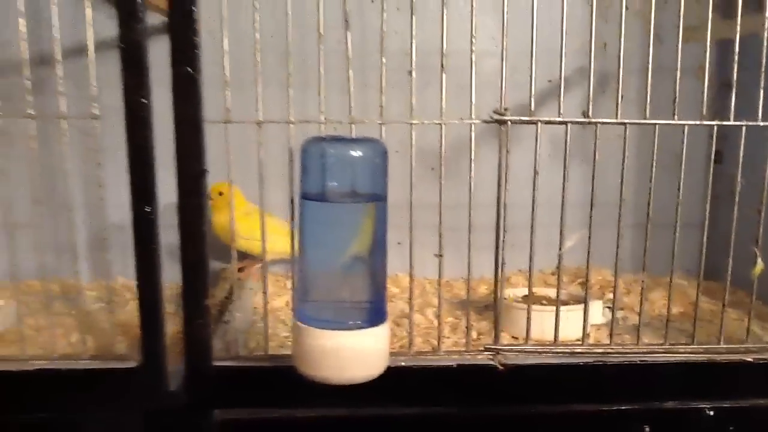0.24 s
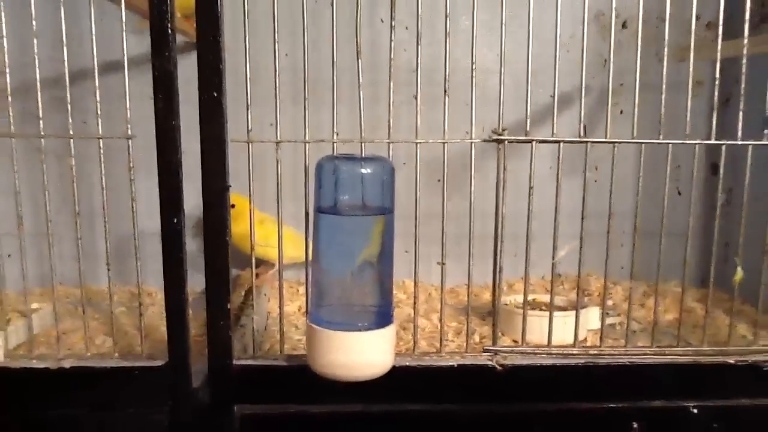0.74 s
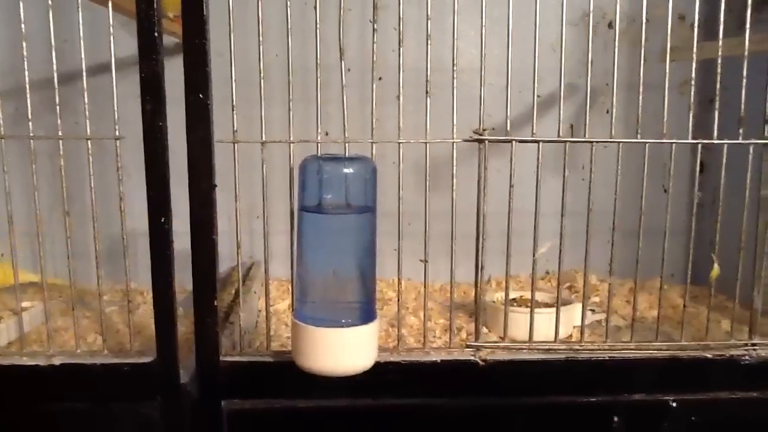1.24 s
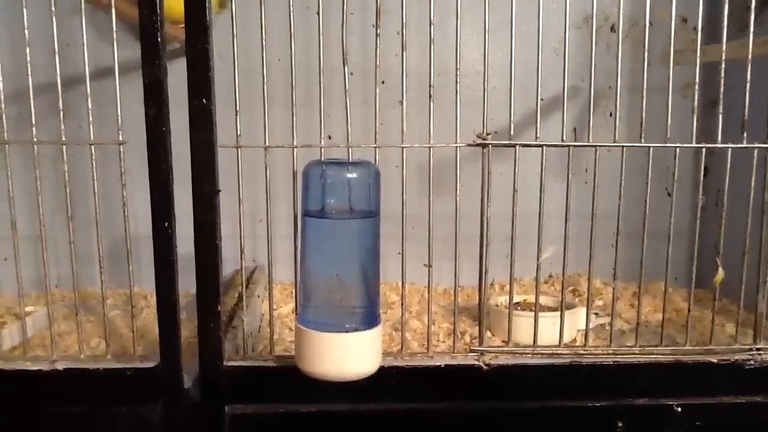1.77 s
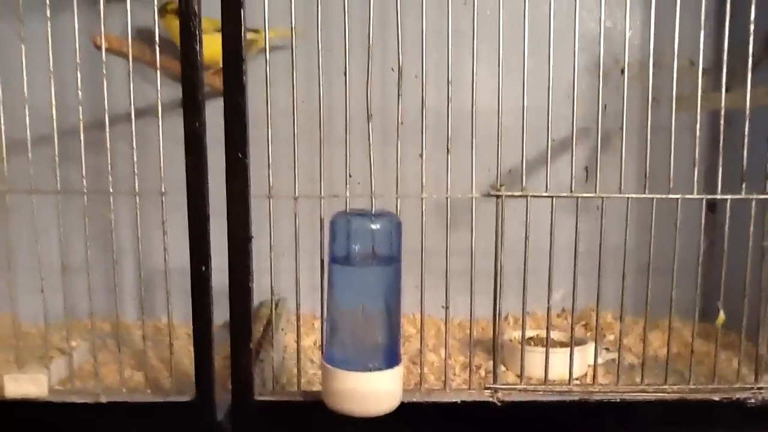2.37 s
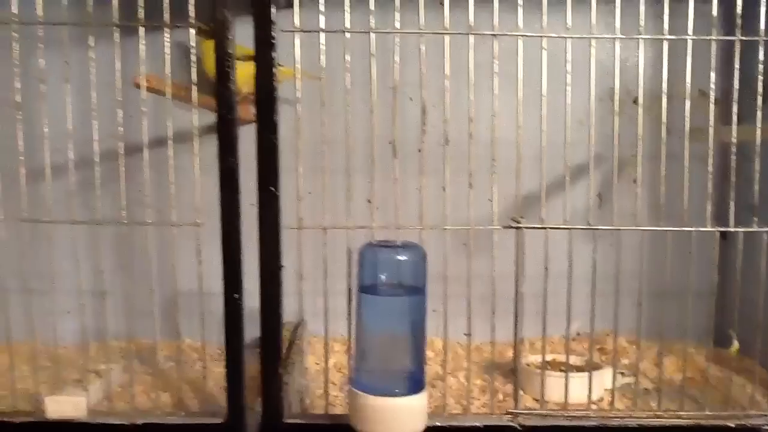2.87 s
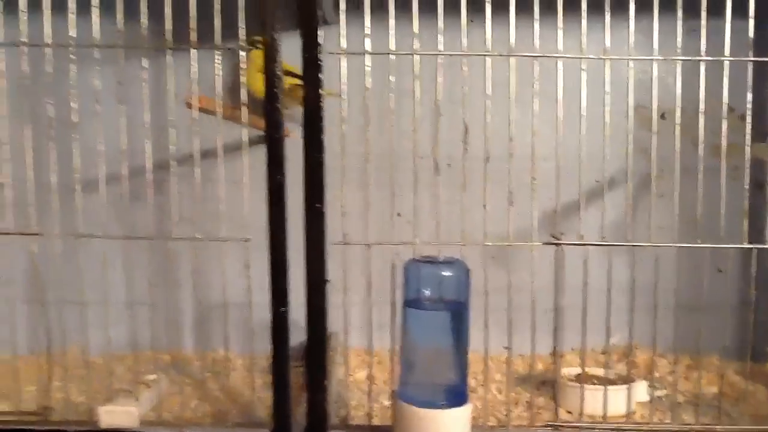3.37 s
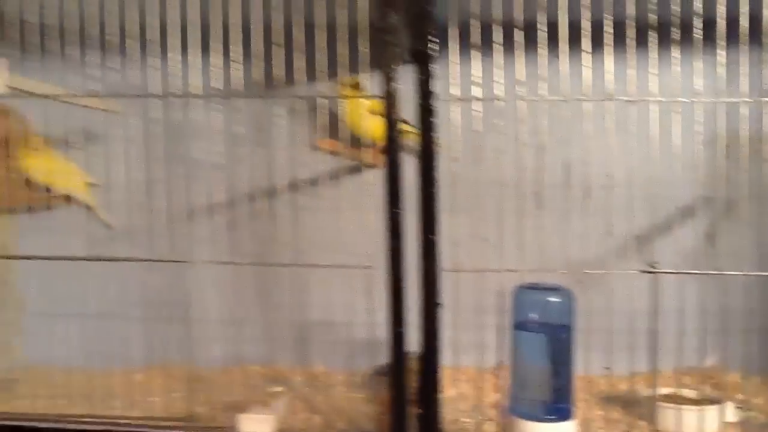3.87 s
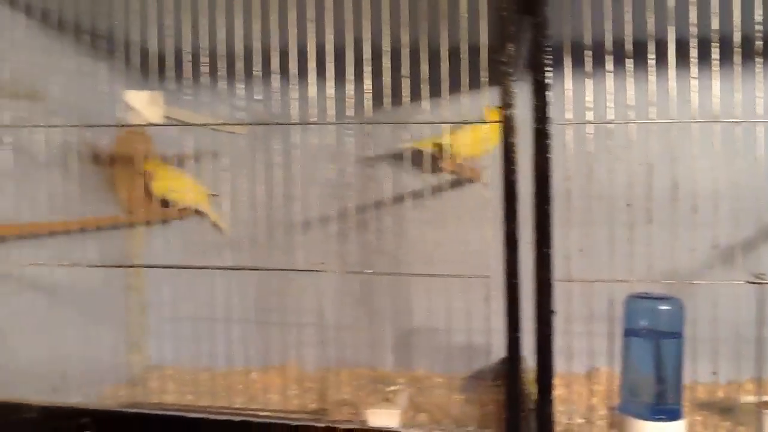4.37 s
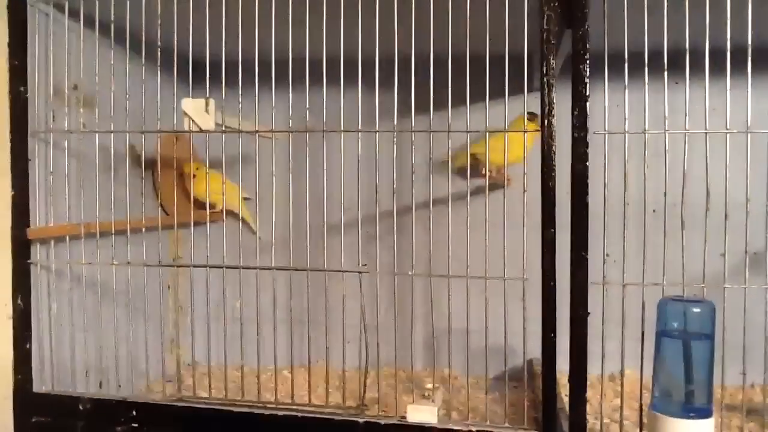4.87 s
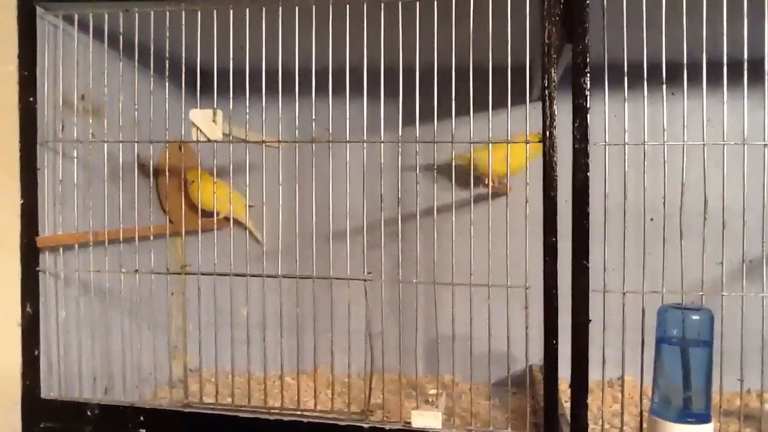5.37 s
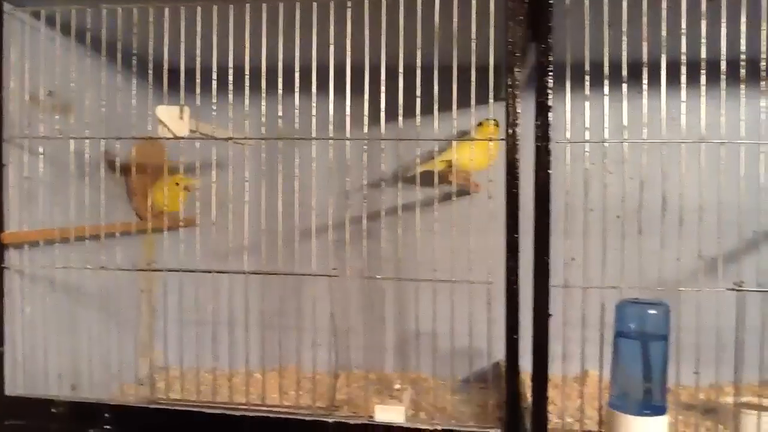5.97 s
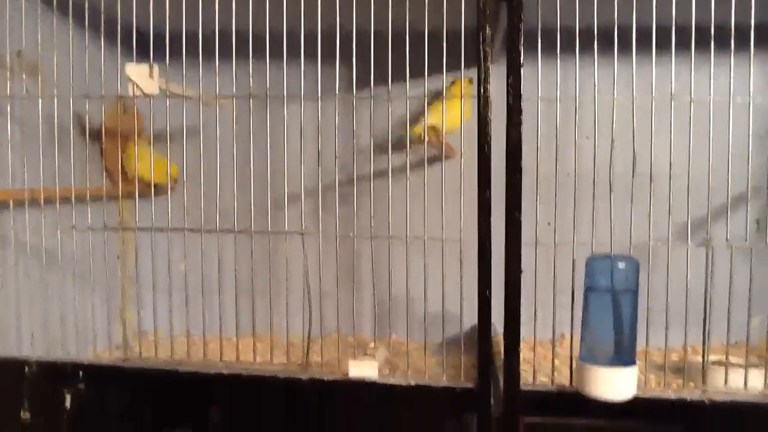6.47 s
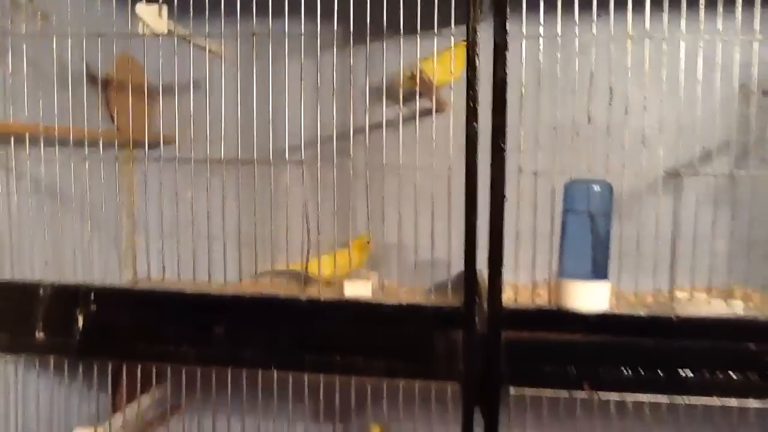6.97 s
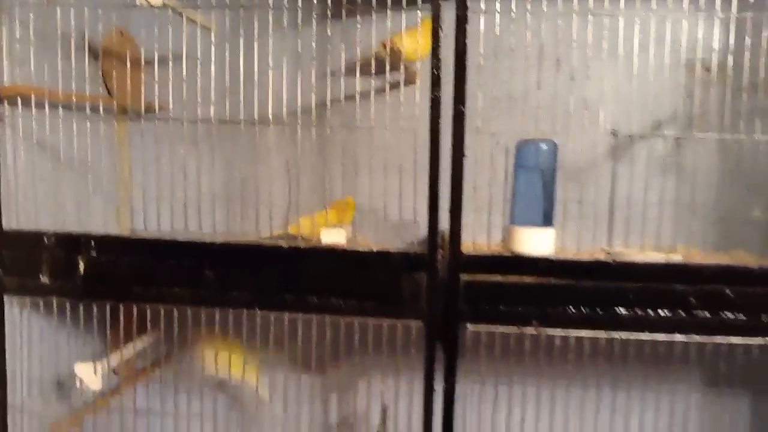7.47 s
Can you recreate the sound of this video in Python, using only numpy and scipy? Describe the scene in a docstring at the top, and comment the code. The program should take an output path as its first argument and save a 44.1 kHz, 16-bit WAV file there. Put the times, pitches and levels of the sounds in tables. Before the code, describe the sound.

Caged finches move about indoors, heard close up: quick squeaky chirps with seed scratching first, then dry little rattles of perch, tray and bars. Around the middle comes one loud, clattering knock with a dull boom, followed by quieter hops and a single piercing snap of a husk. Thin faint whistles, feathery rustling and low hiss lie underneath, with a short room echo.

```python
"""Small finches land and hop on stacked wire breeding cages in a small room, close to the microphone.
Landings are dying rattles that ring tray, perch and bars and scatter litter; one hard jump bangs a cage.
Beaks scuff through resonant seed grains, husks crack in short snaps, and hoarse gliding chirps slip out.
Behind them: dull low thuds, thin high whistles, a steady rustle and hum of the cages, and the room's hiss."""
import sys
import numpy as np
from scipy import signal
from scipy.fft import rfft, irfft
from scipy.io import wavfile
from scipy.ndimage import uniform_filter1d

SR = 44100
rng = np.random.default_rng(int(sys.argv[2]) if len(sys.argv) > 2 else 0)


def put_to_file(sound):
    """Save the sound as 16-bit audio at rate SR, in the file named by the first command-line argument."""
    columns = np.atleast_2d(sound).T  # one column per channel
    safe = np.clip(columns, -1, 1)
    whole_steps = np.round(safe * 32767)
    wavfile.write(sys.argv[1], SR, whole_steps.astype(np.int16))


N = 341334
SPAN = 16384   # samples given to one landing, scuff, thud or ring (0.37 s)


def amp(db):
    """Decibels to gain."""
    return 10 ** (np.asarray(db) / 20)


def unit(x):
    """Scales to rms 1."""
    return x / np.sqrt(np.mean(x ** 2) + 1e-24)


def crest_one(x):
    """Scales so that the loudest 8 ms have rms 1."""
    return x / np.sqrt(uniform_filter1d(x ** 2, size=350).max() + 1e-24)


def at_hz(points, hz):
    """Reads a table of values against frequency on a log-frequency axis."""
    p = np.array(points)
    return np.interp(np.log(np.maximum(hz, 1)), np.log(p[:, 0]), p[:, 1])


def coloured(x, spectrum):
    """Gives a sound the spectrum of a table."""
    n = x.shape[-1]
    bins_hz = np.arange(n // 2 + 1) * SR / n
    return irfft(rfft(x) * amp(at_hz(spectrum, bins_hz)), n)


def grains(count, per_s, spread_db):
    """Random tiny contacts, a few much stronger than the rest."""
    chance, strength, side = rng.random((3, count))
    size = amp(spread_db * np.minimum(-np.log(strength + 1e-9), 4))
    return (chance < per_s / SR) * size * np.sign(side - .5)


def add(out, s, x):
    """Mixes x into out from time s."""
    i = max(round(s * SR), 0)
    out[i:i + len(x)] += x[:N - i]


def ringing(modes, size):
    """Spectra of the modes' answers to a click: a quickly damped thump, then the long ring."""
    t = np.arange(SPAN) / SR
    hz, db, t60 = np.transpose(modes)[:, :, None]
    thump = 1 + 7.2 * amp(-60 * t / (0.023 + 3.6 / hz))
    ring = amp(db - 60 * t / np.maximum(t60, .02)) * np.sin(2 * np.pi * hz * t)
    return rfft(thump * ring, size)


# Hiss of the room, spectrum shape: pitch_hz [Hz], relative_density_db [dB per Hz]
HISS = [(12, -53), (20, -22.5), (59, -27), (196, 12.5), (465, -5), (534, 5), (614, -3), (1300, -19.5),
        (2840, -9.5), (11400, -13), (14300, -24), (15500, -8.5)]
HISS_DB = -70   # rms


def hiss():
    """Steady random noise with the colour of the room's hiss."""
    return amp(HISS_DB) * unit(coloured(rng.standard_normal(N), HISS))


# Modes of tray, perch and bars, also rung by the landings:
# pitch_hz [Hz], relative_level_db [dB], long_ring_t60_s [s]
CAGE_MODES = [(163.5, -3, 0.33), (193, -1, 0.35), (231.6, 5.5, 0.25), (288.3, -0.5, 0.6), (337.5, 0, 0.24),
              (409, 0, 0.072), (489.4, 3.5, 0.18), (536.3, 3, 0.58), (616, 3, 0.16), (706.7, 4, 0.39),
              (790.5, 5, 0.064), (918, 4, 0.088), (973, 2.5, 0.13), (1057, 2, 0.047), (1202, 2, 0.1),
              (1320, 4, 0.064), (1462, 2.5, 0.078), (1600, 5, 0.031), (1808, 2.5, 0.077), (1902, -0.5, 0.2),
              (2100, 0.5, 0.076), (2230, -2.5, 0.073), (2404, -1.5, 0.037)]


def cage_rings():
    """Response of each cage mode, padded for long rings."""
    return ringing(CAGE_MODES, 2 * SPAN)


def cage_parts():
    """Which modes belong to tray, perch and bars, from low to high."""
    hz = np.array(CAGE_MODES)[:, 0]
    return [hz < 450, (hz >= 450) & (hz < 1000), hz >= 1000]


# Restless birds all round, levels joined by straight lines:
# start_s [s], humming_db [dB, cages, before the shares below], rustle_db [dB rms, feathers and litter]
BUSTLE = [(0.0, -61, -57), (0.19, -56.5, -51), (0.39, -64.5, -68), (0.62, -68, -62.5), (0.77, -63.5, -61),
          (1.4, -65, -60.5), (1.7, -70.5, -60), (2.13, -69.5, -62.5), (2.28, -58, -62.5),
          (2.52, -62.5, -58), (2.8, -70.5, -65.5), (3.1, -69.5, -65.5), (3.25, -62.5, -64),
          (3.71, -65.5, -62), (3.97, -65, -64), (4.12, -39.5, -60), (4.24, -59, -59), (4.4, -65.5, -64),
          (4.83, -68.5, -62), (5.13, -70, -67), (5.41, -72.5, -66), (5.56, -61.5, -69), (5.76, -66, -60.5),
          (6.06, -62.5, -64), (6.4, -69.5, -66), (6.64, -71.5, -66), (6.81, -64, -64), (7.24, -65.5, -62.5),
          (7.52, -64, -58), (7.74, -65.5, -60)]
# Feathery rustle, spectrum shape: pitch_hz [Hz], relative_density_db [dB per Hz]
FEATHERS = [(710, -47), (1200, -5), (1380, -6.5), (1550, -6), (1710, -11.5), (3430, -7.5), (13600, -8),
            (15500, -13)]
# Share of trays, perches and bars in the humming [dB each]
HUM_SHARES = -6.5, -4.5, -6.5


def bustle():
    """Faint unceasing contacts in all the cages: the same modes kept ringing, and feathery rustle."""
    s, *levels = np.transpose(BUSTLE)
    humming, feathers = (amp(np.interp(np.arange(N) / SR, s, db)) for db in levels)
    out = feathers * unit(coloured(grains(N, 9000.0, 0.88), FEATHERS))
    # the hum dies sooner than a landing's ring: an extra t60 of 0.072 s
    damping = amp(-60 * np.arange(SPAN) / SR / 0.072)
    signs = (-1) ** np.arange(len(CAGE_MODES))
    for share_db, part in zip(HUM_SHARES, cage_parts()):
        body = irfft(part * signs @ cage_rings())[:SPAN] * damping
        hum = signal.fftconvolve(grains(N, 600.0, 0.77), body)[:N]
        out = out + humming * amp(share_db) * unit(hum)
    return out


# Thin high whistle, in arches: start_s [s], length_s [s], start_hz [Hz], top_hz [Hz, about],
# end_hz [Hz], level_db [dB rms, before flicker and fades]
WHISTLES = [(3.3, .41, 11050, 11800, 11050, -74), (3.74, .09, 11100, 11250, 11050, -74),
            (5.65, .35, 11200, 12000, 11150, -74), (6.0, .145, 11100, 11250, 11000, -72)]


def whistles():
    """A thin, flickering, very high tone whose pitch rises and sinks again."""
    out = np.zeros(N)
    for s, length, start_hz, top_hz, end_hz, db in WHISTLES:
        u = np.linspace(0, 1, round(length * SR))
        base_hz = start_hz + (end_hz - start_hz) * u
        arch_hz = top_hz - (start_hz + end_hz) / 2
        hz = base_hz + arch_hz * np.sin(np.pi * u ** 1.3)
        flicker = amp(3 * unit(uniform_filter1d(rng.standard_normal(len(u)), size=900)))
        tone = np.sqrt(2) * np.sin(2 * np.pi * np.cumsum(hz) / SR)
        add(out, s, amp(db) * flicker * tone * signal.windows.tukey(len(u), .15))
    return out


# Room echo by pitch: pitch_hz [Hz], t60_s [s]
WALLS = [(100, 0.83), (700, 0.37), (4000, 0.15), (13000, 0.12)]


def room(x):
    """Diffuse echo: noise dying at its own rate in each octave, after a half-millisecond rise."""
    t, tail = np.arange(SPAN) / SR, 0
    for hz in 90 * 2. ** np.arange(8):
        band = signal.butter(2, [hz / np.sqrt(2), hz * np.sqrt(2)], "band", fs=SR, output="sos")
        decay = amp(-60 * t / max(at_hz(WALLS, hz), .03))
        octave = signal.sosfilt(band, rng.standard_normal(SPAN)) * decay
        # energy in proportion to the width of the octave
        tail = tail + octave * np.sqrt(hz / np.sum(octave ** 2) / SR * 4)
    return signal.fftconvolve(x, tail * np.minimum(t / 0.0005, 1))[:N]


# Dull thuds through the cage stack: start_s [s], level_db [dB, about 1 dB under the swing's crest], pitch_hz [Hz]
THUDS = [(1.759, -57, 96), (2.037, -65, 96.9), (2.305, -69, 121.4), (4.052, -42, 70.6), (5.652, -73.5, 107),
         (6.142, -61, 122), (6.83, -60, 118)]


def thuds():
    """A soft push that swings a few low cycles."""
    out, t = np.zeros(N), np.arange(SPAN) / SR
    for s, db, hz in THUDS:
        push = (t / 0.0095) * np.exp(1 - t / 0.011)
        add(out, s, amp(db) * np.sin(2 * np.pi * hz * t) * push)
    return out


# Short hoarse chirps and low squeaks: start_s [s], length_s [s], start_hz, middle_hz, end_hz [Hz],
# level_db [dB, fundamental], second_db, third_db [dB, partials against the fundamental],
# hoarseness [0-1, typical pitch tremble as a fraction of the pitch]
CHIRPS = [(0.307, 0.047, 3506, 3054, 3434, -42, -15, -10, 0.093),
          (0.322, 0.039, 2406, 2386, 2624, -52.5, -2.5, 3, 0.088),
          (0.58, 0.06, 2910, 3190, 3140, -51, -9.5, -13, 0.07),
          (0.584, 0.052, 2230, 2344, 2470, -51.5, -6, -8, 0.12),
          (0.738, 0.051, 3290, 5470, 4710, -39, -4.5, -23, 0.072),
          (0.747, 0.045, 3770, 4440, 3840, -43.5, -9, -25, 0.064),
          (0.751, 0.0276, 2280, 2424, 2290, -48.5, -14, -22, 0.097),
          (0.869, 0.066, 1983, 3535, 2990, -44, -7, 0.5, 0.112),
          (.875, 0.061, 2090, 2670, 2230, -46, 0.5, -13, 0.11),
          (1.061, 0.07, 1910, 2150, 2292, -49.5, -9, 1, 0.23),
          (1.4, 0.03, 2550, 2656, 2520, -53, -6, -5, 0.08),
          (1.403, 0.032, 3160, 3260, 3250, -54.5, -7, -9, 0.045),
          (2.615, 0.032, 2950, 3005, 2540, -48, -5.5, -11, 0.058),
          (3.08, 0.035, 3250, 3320, 3230, -53, -3, -7, 0.054),
          (3.082, 0.026, 4740, 4680, 4140, -53, -5, -20, 0.013),
          (4.818, 0.02, 5960, 6220, 5950, -52, -30, -30, .01),
          (5.586, 0.044, 4860, 4760, 4720, -59, -30, -30, 0.028),
          (2.106, 0.14, 525, 546.6, 533, -52.5, -9, -7, 0.067),
          (2.74, 0.092, 548, 535, 550, -60.5, -14, -12, 0.046),
          (5.402, 0.1, 460, 514, 528, -63, -24, -22, 0.046),
          (7.064, 0.071, 557, 563, 507, -59.5, -24, -2, .01),
          (7.421, 0.049, 527, 549, 485, -60.5, -25, -19, 0.044)]


def chirps():
    """A gliding tone with two overtones; its pitch trembles fast, the more the hoarser."""
    out = np.zeros(N)
    for s, length, *glide_hz, db, second_db, third_db, hoarse in CHIRPS:
        u = np.linspace(0, 1, round(length * SR))
        tremble = unit(signal.lfilter([1], [1, -.93], rng.standard_normal(SPAN)))
        tremble = tremble[200:200 + len(u)]   # past the filter's start
        hz = np.interp(u, [0, .4, 1], glide_hz) * (1 + hoarse * tremble)
        phase = 2 * np.pi * np.cumsum(hz) / SR
        overtones = amp(second_db) * np.sin(2 * phase) + amp(third_db) * np.sin(3 * phase)
        swell = np.sin(np.pi * u ** 1.07) ** 0.82
        add(out, s, amp(db) * (np.sin(phase) + overtones) * swell)
    return out


# Husks cracking: start_s [s, first give], level_db [dB, peak of the snap], pitch_hz [Hz, ring],
# scatter_db [dB, bits against the snap]
CRACKS = [(0.1144, -41, 11000, -18), (0.4514, -52, 10400, -13), (0.5075, -51.5, 11500, -5),
          (0.8812, -29, 11400, -19), (1.9092, -23, 9700, -38), (2.4704, -44, 9200, -13),
          (2.9244, -55, 11500, -10), (2.976, -47, 9500, -25), (3.0235, -46, 9230, -20),
          (3.0719, -49, 9400, -20), (4.9521, -4.5, 9540, -19), (5.1746, -44, 9100, -31.5),
          (5.2213, -34, 11200, -15), (6.1473, -44, 7800, -0.5)]
# Dry chaff, spectrum shape, also for scuffs and landings: pitch_hz [Hz], relative_density_db [dB per Hz]
CHAFF = [(4000, -46), (6000, -6.5), (8500, 4), (10500, 4.5), (13000, -0.5), (15500, 0.5)]
GIVE_DB, SNAP_S = -26, .00008   # the husk's first give against the snap; time scale of the snap


def cracks():
    """A faint first give, one hard snap ringing under a millisecond, then scattering bits."""
    out, t = np.zeros(N), np.arange(SPAN // 4) / SR
    for s, db, hz, scatter_db in CRACKS:
        snap = np.sin(2 * np.pi * hz * t) * (t / SNAP_S / 2) ** 2 * np.exp(2 - t / SNAP_S)
        scatter = grains(len(t), 12000.0, 3.8) * amp(-60 * t / 0.018)
        bits = coloured(scatter, CHAFF)[:-400]   # without the end, where colouring wraps round
        add(out, s, amp(db + GIVE_DB) * snap)
        add(out, s + 0.00091, amp(db) * snap)
        add(out, s + 0.0011, amp(db + scatter_db) * crest_one(bits))
    return out


# Beak or claws through seed: start_s [s, halfway up the swell], level_db [dB, heap's loudest 8 ms],
# pitch_hz [Hz, throat of the heap], width_hz [Hz, of one filter pass],
# chaff_db [dB against the heap], swell_s [s], fade_t60_s [s]
SCUFFS = [(.324, -52, 3290, 900, 6, 0.04, 0.18), (.602, -47.5, 3000, 1210, -9, 0.026, 0.14),
          (0.747, -44.5, 4400, 1110, 0, 0.042, 0.21), (0.882, -47, 3670, 3080, 4.5, 0.049, 0.19),
          (1.075, -48.5, 2730, 2850, 9, 0.041, 0.24), (1.2243, -58.5, 1960, 2000, 13, 0.022, 0.074),
          (1.205, -60.5, 3950, 3000, 9, 0.0094, 0.081), (1.41, -62.5, 2870, 1200, 11.5, 0.036, 0.083),
          (2.625, -61.5, 4170, 2500, 3, 0.013, 0.13), (3.097, -60, 3900, 2500, 0, 0.026, 0.99)]


def scuffs():
    """Dense seed grains swell and fade through one broad resonance, with dry chaff on top."""
    out, t = np.zeros(N), np.arange(SPAN) / SR
    for s, db, hz, width_hz, chaff, swell, t60 in SCUFFS:
        rise = np.sin(np.pi / 2 * np.minimum(t / swell, 1)) ** 2
        stroke = rise * amp(-60 * np.maximum(t - swell, 0) / t60)
        seeds = stroke * grains(SPAN, 9700.0, 4.7)
        r = np.exp(-np.pi * width_hz / SR)
        throat = [1, 0.0088, -0.75], [1, -2 * r * np.cos(2 * np.pi * hz / SR), r * r]
        heap = signal.lfilter(*throat, signal.lfilter(*throat, seeds))
        dry_chaff = amp(chaff) * crest_one(coloured(seeds, CHAFF))
        add(out, s - 0.5 * swell, amp(db) * (crest_one(heap) + dry_chaff))
    return out


# Landings and knocks: start_s [s, rattle half built up], level_db [dB, reference for the next five],
# tray_db, perch_db, bars_db, litter_db, chaff_db [dB, loudest 8 ms against level_db],
# tray_hz, perch_hz, bars_hz, wires_hz [Hz, favoured pitch of each part],
# favour_db [dB, how much the cage favours the first three], shaking_t60_s [s]
HOPS = [(0.026, -42.5, -20, -26, -24, -19, -9.5, 164, 590, 1270, 7300, 8.9, 0.26),
        (0.072, -41.5, -21, -14, -22, -19, -13, 175, 570, 1180, 9540, 10, 0.18),
        (0.106, -38, -15.5, -14, -14.5, -24, -26, 164, 810, 1350, 2880, 9.5, 0.29),
        (0.197, -28.5, -29.5, -24, -13, -16.5, -27, 410, 1010, 1280, 2500, 5, 0.12),
        (0.668, -32.5, -29, -24, -13.5, -13.5, -18, 155, 940, 1610, 4000, 6.6, 0.16),
        (0.971, -43.5, -49, -45, -28, -20, -4, 366, 479, 2310, 9900, 10, 0.17),
        (1.353, -39, -20, -23, -9, -13.5, -13.5, 169, 605, 1690, 2500, 10, 0.12),
        (1.389, -42.5, -18.5, -30, -18, -12, -10.5, 420, 564, 2110, 2500, 11, 0.15),
        (1.554, -46.5, -21, -34, -42, -30, -6.5, 322, 664, 1400, 9960, 8.9, 0.43),
        (1.675, -46.5, -24, -20, -10.5, -21, -16, 229, 640, 1390, 2590, 6.1, 0.21),
        (1.753, -44, -17, -26, -14, -19, -14, 217, 590, 1510, 3300, 4.3, 0.45),
        (1.906, -31, -44, -47, -36, -28.5, -13.5, 205, 721, 2320, 9400, 7.6, 0.2),
        (2.035, -55, -6, -13, -23, -35, -33, 260, 630, 1340, 4620, 10, 0.11),
        (2.11, -39.5, -25, -9, -13, -25, -15, 454, 520, 1630, 7060, 10.4, 0.44),
        (2.183, -35, -23, -20.5, -15.5, -23, -11.5, 237, 527, 1600, 10400, 10, 0.27),
        (2.296, -37, -13.5, -18, -13, -12.5, -20, 189.6, 655, 1320, 3900, 10, 0.062),
        (2.317, -40, -11, -12.5, -15, -22, -10.5, 195, 665, 2320, 2710, 10, 0.12),
        (2.347, -39, -17, -11.5, -16.5, -12, -27, 191, 556, 1390, 4130, 12, 0.12),
        (2.473, -53, -8, -16, -27, -27, -18, 274, 522, 1240, 9200, 10, 0.13),
        (2.729, -45.5, -17.5, -13, -16.5, -14, -12, 423, 514, 1290, 3200, 8.3, 0.21),
        (3.071, -46.5, -36, -20.5, -19, -20, -14, 256, 585, 2370, 3240, 7.1, 0.45),
        (3.195, -42, -21, -15, -17, -14.5, -10, 263, 533, 1270, 9330, 8.2, 0.15),
        (3.216, -38, -34, -15.5, -10.5, -15.5, -16, 406, 940, 1380, 3000, 13, 0.22),
        (3.244, -37, -16, -19, -10.5, -20, -13, 148.5, 960, 1330, 7030, 11, 0.23),
        (3.338, -47, -20, -16, -17, -20, -16, 350, 522, 1280, 11300, 12, 0.097),
        (3.69, -51, -31, -25, -12, -12, -9, 380, 606, 1350, 7620, 15, 0.3),
        (3.851, -48, -26, -22, -20, -18, -10, 181, 498, 1510, 10300, 11, 0.26),
        (3.91, -47, -24, -10.5, -21, -18, -6.5, 191, 535, 1640, 6820, 10, 0.41),
        (3.95, -28, -28, -12, -12, -19.5, -20, 420, 990, 990, 6500, 10, 0.15),
        (4.053, -12.5, -15.5, -16, -16, -15.5, -16, 233, 950, 2340, 5130, 9.1, 0.12),
        (4.076, -8.5, -26, -22, -24, -20, -14.5, 173, 634, 1060, 6380, 9.4, 0.097),
        (4.099, -18, -9, -14, -22.5, -18.5, -17, 184, 616, 2020, 6430, 6.4, 0.19),
        (4.158, -24, -12, -12.5, -20.5, -19.5, -29.5, 270, 488, 1300, 4780, 15, 0.086),
        (4.245, -44, -22.5, -41, -12, -13, -15, 283, 714, 2100, 4800, 10, 0.093),
        (4.307, -42.5, -18, -47, -19.5, -20, -13, 232.4, 650, 1216, 5200, 10, 0.31),
        (4.357, -32.5, -35, -46, -11, -17, -22, 218, 636, 1544, 2660, 10, 0.081),
        (4.379, -37, -19, -15, -16.5, -30, -20, 163, 624, 1400, 2610, 17, 0.13),
        (4.544, -40.5, -23, -22.5, -30, -24, -15, 282, 460, 1560, 12000, 7.5, 0.24),
        (4.596, -45.5, -24, -18, -12.5, -18.5, -10.5, 291, 454, 2000, 7300, 9.2, 0.23),
        (4.678, -43.5, -23, -13.5, -24, -21.5, -13, 445, 780, 1980, 8030, 13, 0.094),
        (4.772, -42.5, -16, -11, -17, -23, -16, 409, 934, 1280, 4730, 12, 0.11),
        (4.818, -49.5, -15, -26, -24, -22, -5, 294, 517, 1430, 5760, 10, 0.055),
        (4.854, -45, -23, -15, -11, -18, -14, 300, 1000, 1980, 5840, 10, 0.13),
        (4.908, -51.5, -16, -8.5, -10.5, -28, -21, 195, 514, 1330, 7330, 12.5, 0.28),
        (5.173, -47, -27, -22, -19, -20, -16, 205, 580, 1750, 9100, 10, 0.071),
        (5.375, -47.5, -26, -25, -6.5, -15.5, -23, 158, 940, 1330, 2600, 6.3, 0.21),
        (5.401, -43.5, -23, -12.5, -10, -20, -20, 456, 470, 1540, 2680, 13, 0.11),
        (5.444, -49, -31, -15, -27, -18, -12, 240, 493, 1490, 8420, 10, 0.15),
        (5.51, -41.5, -18, -13.5, -18, -17, -13, 347, 596, 1520, 9600, 10, 0.27),
        (5.584, -40.5, -30, -23, -23, -18.5, -9.5, 269, 550, 1320, 6750, 14, 0.2),
        (5.659, -48, -12, -11, -24, -30, -30, 170, 605, 1330, 11300, 10, 0.12),
        (5.706, -31.5, -50, -24, -15.5, -13, -11, 453, 870, 1780, 7700, 10, 0.12),
        (5.816, -46.5, -40, -24, -12, -22, -10, 232, 452, 1120, 12000, 10, 0.45),
        (5.858, -40, -27, -21, -24, -21, -12, 194, 465, 2100, 10600, 11, 0.31),
        (5.918, -43, -16.5, -10, -9.5, -24, -32, 169, 860, 1530, 3580, 12, 0.14),
        (5.968, -48.5, -16, -12, -11, -20, -21, 437, 440, 1520, 2610, 12, 0.15),
        (6.145, -34.5, -27, -24.5, -25, -24.5, -21, 275, 455, 1470, 7800, 10, 0.26),
        (6.615, -39, -20, -15, -17, -22.5, -18.5, 230, 860, 1490, 6750, 11, 0.26),
        (6.664, -44.5, -9.5, -14.5, -20, -16.5, -13.5, 195, 587, 2100, 7950, 13.6, 0.45),
        (6.824, -30, -28.5, -35, -24, -21, -7.5, 248, 560, 1320, 10500, 8.1, 0.14),
        (6.891, -42.5, -19, -23.5, -30, -22, -12.5, 195, 549, 2260, 9780, 14, 0.34),
        (6.968, -34, -34, -29, -30, -25.5, -10.5, 210, 534, 1320, 11400, 9.2, 0.16),
        (7.069, -44.5, -19, -13.5, -13.5, -22, -20, 263, 595, 1630, 5290, 12, 0.1),
        (7.173, -49, -16, -35, -17, -25, -10, 261, 541, 1070, 11900, 10, 0.11),
        (7.323, -42.5, -30, -31, -19, -20, -14, 204, 552, 1490, 8590, 10, 0.3),
        (7.413, -41.5, -23, -21, -17, -22, -11.5, 143, 578, 1124, 8880, 8.7, 0.45),
        (7.456, -44.5, -24, -26, -22, -19, -10, 229, 520, 1130, 8260, 7.5, 0.24),
        (7.564, -40, -20, -9, -16.5, -16, -16, 165, 956, 990, 3400, 10, 0.27)]
# Thin wires of the cage front: pitch_hz [Hz], relative_level_db [dB], long_ring_t60_s [s]
WIRES = [(2670, 12, 0.14), (3057, 10, 0.23), (3290, 9, 0.29), (3537, 5, 0.42), (4140, 10, 0.037),
         (3950, 1, 0.11), (4730, 15, 0.12), (5300, 14, 0.077), (5540, -40, 0.066), (5770, 20, 0.17),
         (6750, -26, 0.07), (6520, -16, 0.11), (7800, 7.5, 0.15), (8420, 9, 0.29), (9380, 1.5, 0.047),
         (9600, -12, 0.08), (11500, -7, 0.081)]
# Flung litter, spectrum shape: pitch_hz [Hz], relative_density_db [dB per Hz]
LITTER = [(1800, -18), (2600, 9.5), (3500, 6.5), (5200, 6), (7000, 3), (9000, -55)]
# Tinkle of long wires against litter, of short wires against chaff [dB each]
TINKLE = -2.5, -10
BUILD_UP_S, WIRE_FAVOUR_DB = .003, 25   # rise of the rattle; how much the favoured wire stands out


def hops():
    """Each landing is a dying rattle of contacts that rings the cage and throws up litter."""
    out, t, rings = np.zeros(N), np.arange(SPAN) / SR, cage_rings()
    hz = np.array(CAGE_MODES)[:, 0]
    wires, wire_hz = ringing(WIRES, SPAN), np.array(WIRES)[:, 0]
    long = wire_hz < 6200   # low-pitched wires
    first_blow = 60.0 * (np.arange(SPAN) == 40)
    for s, db, tray, perch, bars, litter, chaff, *cage_hz, front_hz, favour_db, t60 in HOPS:
        s -= BUILD_UP_S / 2   # the rattle is half built up at the moment listed
        shake = np.minimum(t / BUILD_UP_S, 1) * amp(-60 * t / max(t60, .01))
        rattle = shake * (grains(SPAN, 5000.0, 4.55) + 0.49 * rng.standard_normal(SPAN))
        # the spot that is hit favours one pitch in each part
        near = favour_db * sum(np.exp(-(np.log(hz / f) / 0.082) ** 2) for f in cage_hz)
        strength = amp(near + 2 * rng.standard_normal(len(hz))) * (-1) ** np.arange(len(hz))
        # the cage feels the first blow most, then the rattle
        push = rfft(unit(rattle) + first_blow, 2 * SPAN)
        for part, part_db in zip(cage_parts(), (tray, perch, bars)):
            ring = irfft(push * (strength * part @ rings))
            add(out, s, amp(db + part_db) * crest_one(ring))
        # flung litter hisses and sets single wires of the front tinkling
        chosen = WIRE_FAVOUR_DB * np.exp(-(np.log(wire_hz / front_hz) / 0.16) ** 2)
        plucked = amp(chosen + rng.normal(0, 2.5, len(WIRES)))
        layers = zip((LITTER, CHAFF), (long, ~long), (litter, chaff), TINKLE)
        for colour, part, part_db, tinkle_db in layers:
            # every second bin is the same push at the wires' shorter length
            tinkle = crest_one(irfft(push[::2] * (plucked * part @ wires)))
            flung = crest_one(crest_one(coloured(rattle, colour)) + amp(tinkle_db) * tinkle)
            add(out, s, amp(db + part_db) * flung[:-400])
    # a small cage radiates no deep bass
    return signal.sosfilt(signal.butter(3, 140.0, "high", fs=SR, output="sos"), out)


WET_DB, CHIRP_WET_DB = -13.5, -3.5   # sent to the room echo: cage and seed sounds; chirps


def scene():
    """Birds near the microphone, the room answering, the hiss below."""
    birds = hops() + scuffs() + cracks() + thuds()
    squeaks = chirps()
    echo = room(amp(WET_DB) * birds + amp(CHIRP_WET_DB) * squeaks)
    return (birds + squeaks + echo + bustle() + whistles() + hiss())[None]


CUTOFF_HZ = 15650   # stop-band edge, 50 dB down


def record(dry):
    """The small microphone drops the deep bass; the top is cut."""
    thin = signal.sosfilt(signal.butter(2, 90.0, "high", fs=SR, output="sos"), dry)
    return signal.sosfilt(signal.cheby2(24, 50, CUTOFF_HZ, fs=SR, output="sos"), thin)


dry = scene()
out = record(dry)
put_to_file(out)
```